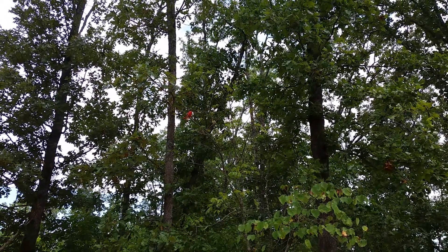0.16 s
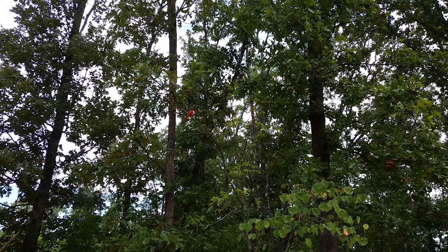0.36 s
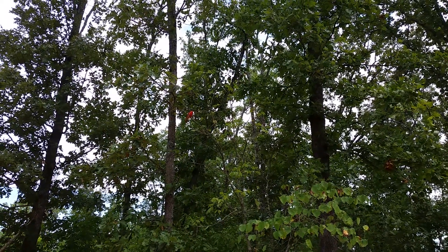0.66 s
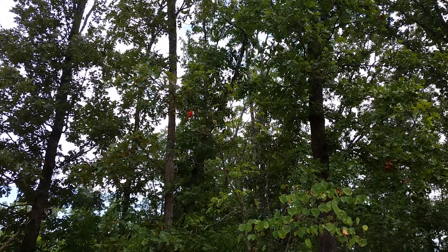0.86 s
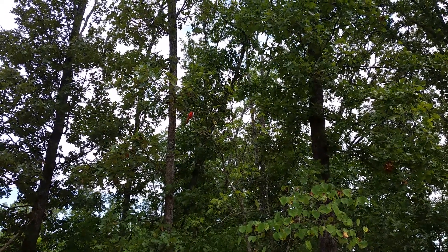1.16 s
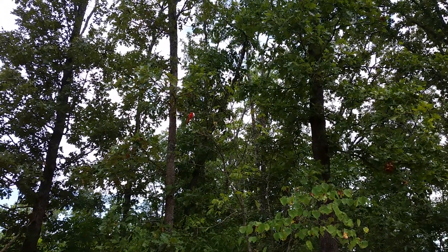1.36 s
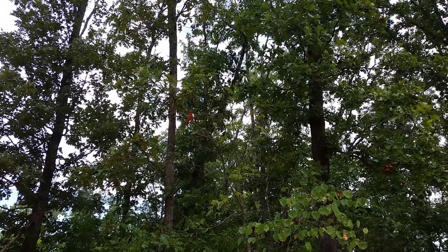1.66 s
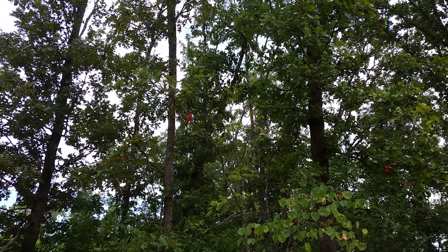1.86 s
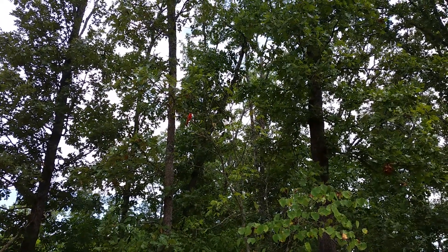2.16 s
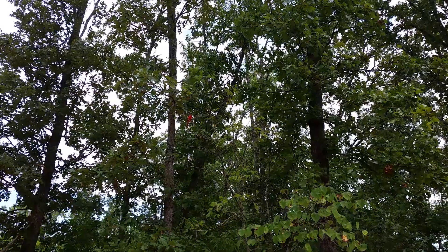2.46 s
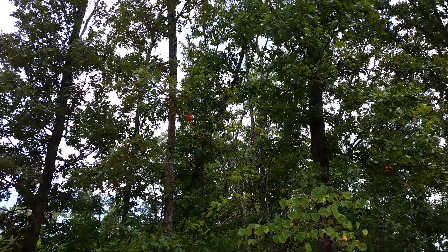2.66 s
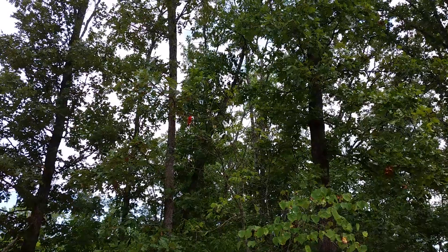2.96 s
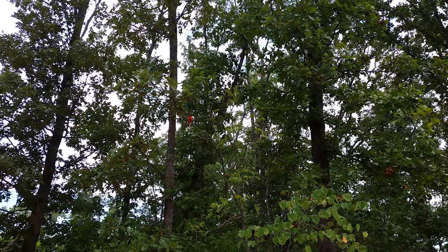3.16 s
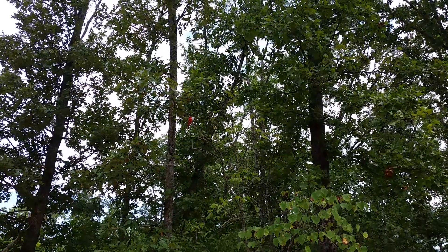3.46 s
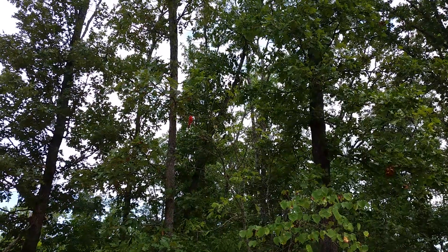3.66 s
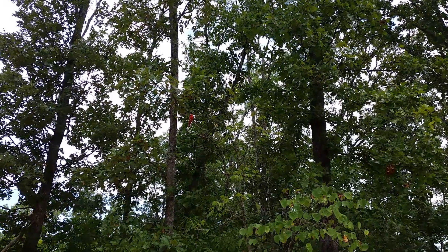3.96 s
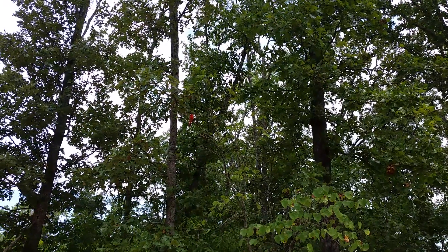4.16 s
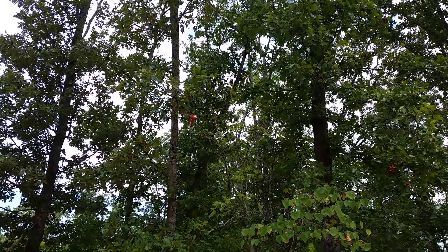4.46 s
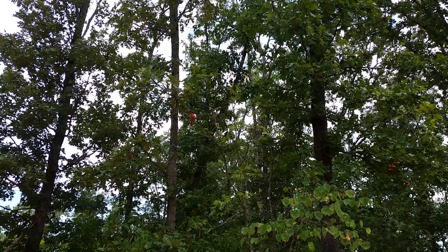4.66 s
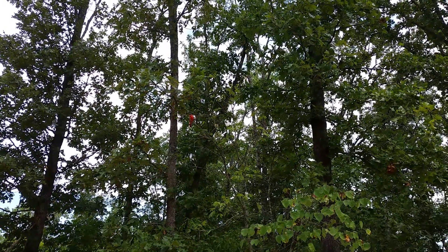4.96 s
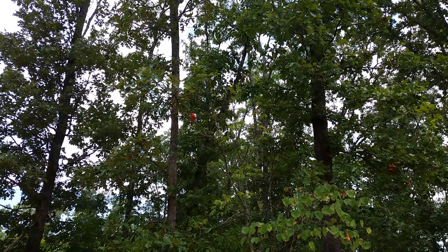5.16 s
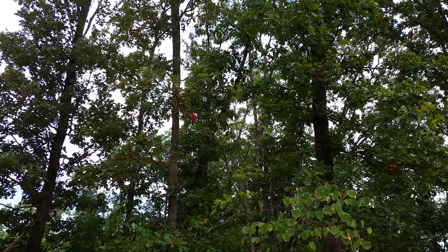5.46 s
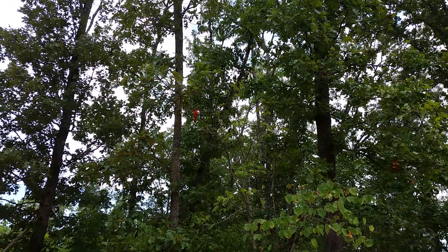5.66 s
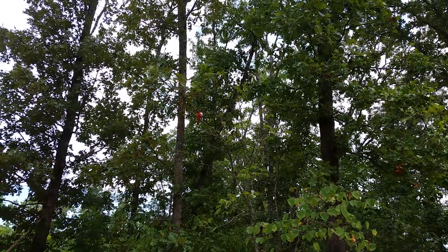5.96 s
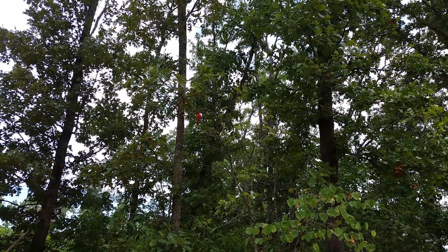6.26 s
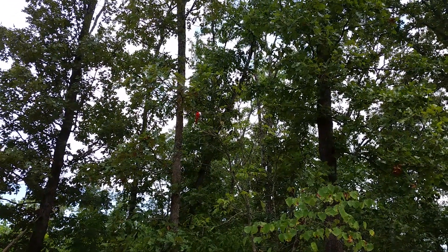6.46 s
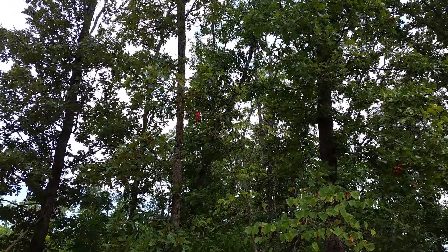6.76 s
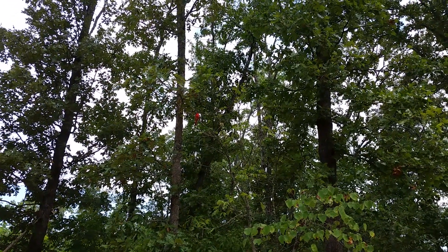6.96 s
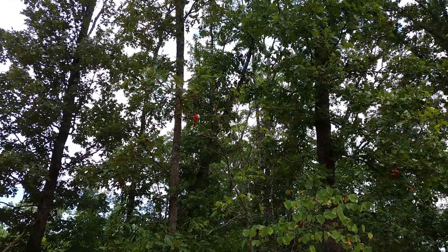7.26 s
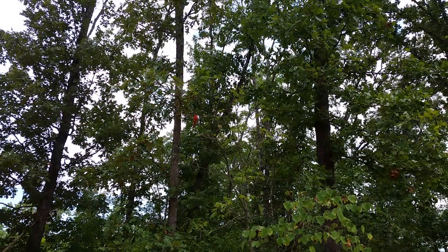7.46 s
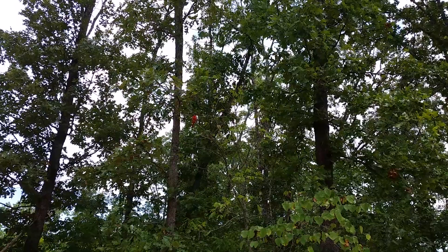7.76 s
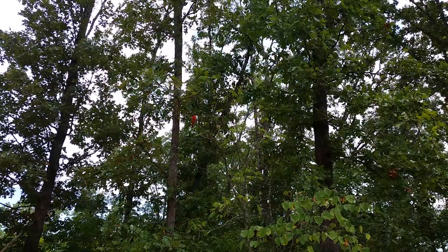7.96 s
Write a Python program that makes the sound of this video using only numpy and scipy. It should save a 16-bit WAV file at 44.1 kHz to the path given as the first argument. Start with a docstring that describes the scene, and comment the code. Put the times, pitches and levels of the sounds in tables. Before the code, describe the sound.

Distant cicadas hiss steadily among trees while a bird chips brightly four times, a katydid ticks and buzzes faintly, and a hand knocks the microphone.

```python
"""First heard are cicadas droning far off in a wood, over still air and a hand rumbling at the left port of a phone.
High among the trunks a songbird gives four short rising chips, whistle and octave, scattered by noise echoes.
A meadow katydid ticks twelve times, then buzzes: bands of noise shaped by wing strokes.
The cicadas are pulsed noise in resonances; the hand is filtered noise, with damped swings for bumps and
short dents for ticks. The two phone ports serve as left and right microphones."""
import sys
import numpy as np
from scipy import signal
from scipy.fft import rfft, irfft
from scipy.io import wavfile
from scipy.ndimage import uniform_filter1d, minimum_filter1d

SR = 44100
rng = np.random.default_rng(int(sys.argv[2]) if len(sys.argv) > 2 else 0)


def dump(signal):
    """Clip the signal to [-1, 1] and save it as 16-bit WAV at the path in sys.argv[1]."""
    limited = np.clip(np.atleast_2d(signal).T, -1, 1)
    pcm = np.round(limited * 32767).astype(np.int16)
    wavfile.write(sys.argv[1], SR, pcm)


N = 357210  # samples


def undb(db):
    """Decibels to amplitude."""
    return 10 ** (np.asarray(db) / 20)


def unit(x):
    """Scale each channel to an RMS of 1."""
    return x / np.sqrt(np.mean(x ** 2, axis=-1, keepdims=True))


def curve(rows):
    """Columns of a (t/s, ..) table, interpolated at every sample."""
    s, *columns = np.transpose(rows)
    return [np.interp(np.arange(N) / SR, s, column) for column in columns]


def band(x, hz, width_hz):
    """Steep resonance: a two-pole band-pass applied twice, gain 1 at the centre."""
    b, a = signal.iirpeak(hz, hz / width_hz, fs=SR)
    once = signal.lfilter(b, a, x)
    return signal.lfilter(b, a, once)


def sides(pan_db):
    """Left and right gains that differ by pan_db."""
    return undb(np.array([pan_db, -pan_db]) / 2)


def walk(rate):
    """Random levels held 1 / rate s and slewed twice; spread near 1."""
    hold = int(SR / rate)
    steps = np.repeat(rng.standard_normal(N // hold + 1), hold)
    slewed = uniform_filter1d(uniform_filter1d(steps, hold), hold)
    return 1.28 * slewed[:N]


def add(out, s, x):
    """Mix a stereo sound into out from time s."""
    i = int(s * SR)
    out[:, i:i + x.shape[1]] += x[:, :N - i]


# Far cicada chorus, broad body resonances, then narrow steady peaks that give the drone a fine ripple;
# levels are relative: [f/Hz, width of each filter pass/Hz, left level/dB, right level/dB]
CICADA_BANDS = [(2924, 600, -24.5, -14), (3545, 960, -13.5, -7), (4140, 1040, -13, -8.5),
                (4994, 820, -6, -5.5), (5560, 670, -4, -4.5), (6157, 547, -1, 2), (7035, 395, -2, -9),
                (7740, 770, -5, -10.5), (8600, 500, -25, -32), (2690, 70, -26, -13),
                (3193, 140, -17.5, -4.5), (3427, 74, -14, -3), (3582, 91, -24, 0), (3980, 88, -8, -3.5),
                (4156, 73, -3.5, -5.5), (4600, 90, -6, -1.5), (4853, 92, -6, 1), (5800, 52, 0, 6),
                (6220, 80, 5.5, -1), (6750, 114, 2, 1.5), (7290, 140, 3, -8), (7853, 100, -2, -17)]
TYMBAL_HZ, RIBS = 44.35, 8  # mean muscle beat; rib clicks per beat
CHORUS_SHARED, CHORUS_LAG = 0.34, 21  # share heard alike at both ports; samples by which the right one lags


def cicadas(top_db):
    """Noise rings in broad and narrow bands, pulsed by the tymbal muscle beat and its rib clicks."""
    beat = 2 * np.pi * np.cumsum(TYMBAL_HZ * (1 + 0.00808 * walk(1.7))) / SR
    out = 0
    for hz, width_hz, l_db, r_db in CICADA_BANDS:
        shift = rng.uniform(0, 1.0, 3)  # radians
        depth = .32 if hz < 4500 else .14
        throb = 1 + depth * np.cos(beat + shift[0])
        throb = throb + 0.07 * np.cos(2 * beat + shift[1])
        throb = throb + 0.32 * np.cos(RIBS * beat + shift[2])
        left, other = rng.standard_normal((2, N))
        right = CHORUS_SHARED * np.roll(left, CHORUS_LAG) + np.sqrt(1 - CHORUS_SHARED ** 2) * other
        hiss = band(throb * np.array([left, right]), hz, width_hz) * np.sqrt(SR / 15000)
        # turning the phone changes the high bands at the left port only
        turn_db = np.clip((hz - 5500) / 1500, 0, 1) * top_db * np.array([[1], [0]])
        drift_db = .6 * walk(1.126) + 0.72 * walk(8)
        out = out + undb([[l_db], [r_db]] + turn_db + drift_db) * hiss
    return out


# Colour of the still air and distant hum, relative: [f/Hz, left level per Hz/dB, right level per Hz/dB]
HUSH_COLOUR = [(40, 21, 6.5), (108, 16.5, 18), (240, -4.5, 10.5), (650, 2, 5.5), (1020, -6, -1.5),
               (1550, -7, -1.5), (2320, -7.5, 4), (8880, -1.5, 0), (9030, -36, -33), (11400, -36, -44),
               (11870, -14, -3), (12400, -10.5, -7), (13500, -7.5, -10), (16300, -20, -2.5)]
HUSH_DB = -20.5  # whole hush against the cicadas


def hush():
    """Smooth far noise, coloured in frequency and unrelated at the two ports."""
    hz, *ears_db = np.transpose(HUSH_COLOUR)
    log_f = np.log(np.maximum(np.fft.rfftfreq(N, 1 / SR), 1))
    colour = undb([np.interp(log_f, np.log(hz), db) for db in ears_db])
    spectrum = rfft(rng.standard_normal((2, N)))
    return undb(HUSH_DB) * irfft(spectrum * colour, N)


# Hand gripping the phone: [t/s, rumble level at the left port/dB]
GRIP = [(0.0, -40.5), (1.65, -41), (1.83, -39), (2.84, -40.5), (3.87, -40), (3.9, -33.5), (4.9, -29.5),
        (5.21, -34.5), (5.57, -37.5), (5.91, -34), (6.41, -37.5), (7.04, -38.5), (8.1, -37)]


def rumble():
    """Muscle tremor shakes the case: low noise in two resonances, far weaker at the right port."""
    noise = rng.standard_normal((2, N))
    tremor = unit(band(noise, 64, 42) + 0.36 * band(noise, 96.7, 46.7))
    return tremor * undb(curve(GRIP)[0] + 1.43 * walk(14)) * undb([[0], [-20.5]])


# Skin sliding on the case in short slips: [t of peak/s, left peak level/dB, fade per 20 dB/s]
SLIPS = [(3.9, -52, .08), (4.2, -59, .12), (4.72, -58, .08), (4.85, -50, .08), (5.38, -57, .3),
         (5.46, -61, .1), (5.9, -47.5, .1), (5.94, -45, .035), (6.06, -46, .025), (6.1, -43, .02),
         (6.3, -62, .6)]
RUB_RISE_S, RUB_FLOOR_DB = .04, -72  # rise per 20 dB; resting contact


def rub():
    """Skin friction: uneven grit between 200 and 800 Hz, swelling with each slip."""
    grit = undb(2.5 * rng.exponential(size=(2, N))) * rng.standard_normal((2, N))
    b, a = signal.butter(2, [200, 800], "band", fs=SR)
    scuff = unit(signal.lfilter(b, a, grit)) * undb(2.0 * walk(53))
    now = np.arange(N) / SR
    slips = sum(undb(db - 20 * np.maximum((s - now) / RUB_RISE_S, (now - s) / fade)) for s, db, fade in SLIPS)
    return scuff * (slips + undb(RUB_FLOOR_DB)) * undb([[0], [-13]])


# Dull finger bumps on the case: [t near the strongest swing/s, relative left level/dB, nominal ring f/Hz]
BUMPS = [(0.416, -24, 74), (1.07, -25.5, 74), (1.403, -29, 77.6), (2.734, -16, 76), (2.841, -18.5, 57),
         (3.924, -20.5, 71), (3.974, -25, 65), (4.079, -20.5, 65), (4.126, -22.5, 89), (4.175, -18, 81),
         (4.222, -16.5, 81), (4.681, -18.5, 73), (4.731, -12.5, 100), (4.839, -21.5, 94), (4.942, -17, 85),
         (4.96, -5.5, 122.5), (4.989, -18, 54.5), (5.28, -24, 71.6), (5.327, -23.5, 78.5),
         (5.816, -25, 68.5), (5.875, -26.5, 88), (5.916, -23, 82.4), (6.057, -23, 85.5), (6.095, -21, 84),
         (6.296, -26, 91), (6.365, -20, 115), (6.642, -26, 89), (6.744, -24, 80), (6.91, -26.5, 79),
         (7.647, -27.5, 73), (7.752, -25.5, 79)]
BUMP_RIGHT_DB = -28  # right port against left
FAINT_BUMP_COUNT, FAINT_BUMP_DB, FAINT_BUMP_HZ = 9, -32, 72  # placed at random, level and pitch scattered


def bumps():
    """A bump sets the case swinging low; the swing swells, slows and dies within a few cycles."""
    out = np.zeros((2, N))
    t = np.arange(SR // 8) / SR
    faint = [(.1 + u * (N / SR - .3), FAINT_BUMP_DB + 6 * (v - .5), FAINT_BUMP_HZ * (1 + .3 * (w - .5)))
             for u, v, w in rng.uniform(size=(FAINT_BUMP_COUNT, 3))]
    for s, db, hz in BUMPS + faint:
        cycles = t * hz
        # the case bends quickly at first, then swings slower as it settles
        swing = np.sin(2 * np.pi * (0.76 * cycles + 0.58 * (1 - np.exp(-cycles / .5))))
        swell = cycles / .6 * np.exp(1 - cycles / 0.63)
        add(out, s - .7 / hz, -undb([[db], [db + BUMP_RIGHT_DB]]) * swell * swing)
    return out


# Sharp ticks of skin and case: [t 1 ms before the dent/s, relative left level/dB, relative right level/dB]
CLICKS = [(2.721, -44, -33), (2.829, -40.5, -27.5), (3.893, -45, -31), (4.03, -43, -36),
          (4.199, -34.5, -42.5), (4.355, -34.5, -59), (4.568, -35.5, -42.5), (4.711, -36.5, -59),
          (4.722, -39.5, -51), (4.844, -40.5, -40), (4.955, 4, -34.5), (4.974, -22, -30.5),
          (5.549, -36, -57), (5.925, -35.5, -47), (5.937, -29.5, -51), (5.951, -32.5, -53),
          (6.0, -38.5, -53), (6.022, -37.5, -54), (6.039, -25.5, -51), (6.049, -33.5, -55),
          (6.081, -20.5, -46), (6.1, -27.5, -62), (6.22, -34.5, -61), (6.287, -30.5, -53),
          (6.36, -39.5, -60), (6.553, -32.5, -56), (6.623, -36.5, -64)]
CLICK_WIDTH_MS, CLICK_RIGHT_WIDTH_MS = .48, .3  # thinner and brighter at the right port


def clicks():
    """Each tick is a sharp inward dent inside a broader rebound, with a little decaying noise."""
    out = np.zeros((2, N))
    t = np.arange(SR // 8) / SR
    for s, l_db, r_db in CLICKS:
        x = (t - .004) * 1000 / np.array([[CLICK_WIDTH_MS], [CLICK_RIGHT_WIDTH_MS]])
        rebound = 0.31 * np.exp(-(x / 3.6) ** 2)
        dent = np.exp(-x ** 2) + 0.26 * np.exp(-np.hypot(x, .2) / 0.43)
        noise = band((t > .003) * rng.standard_normal(len(t)), 970, 2000)
        snap = rebound - dent + 0.12 * np.exp(-t / .004) * noise
        add(out, s - .003, undb([[l_db], [r_db]]) * snap)
    return out


def hand():
    """Everything the hand does to the case: tremor, rubbing, bumps and ticks."""
    return rumble() + rub() + bumps() + clicks()


# Echo decays of the wood, near leaves then far trunks: [60 dB fade t/s, relative level/dB]
WOOD_DECAYS = [(0.158, -1.5), (.7, -11.5)]
TRUNK_S, TRUNK_DB = 0.0534, 1.5  # delay and level of one trunk's answer at the right, against the fade


def wood():
    """Scattered echoes, uneven in size and different at each port; one trunk on the right answers more strongly."""
    t = np.arange(SR // 2) / SR
    fade = sum(undb(db - 60 * t / t60) for t60, db in WOOD_DECAYS)
    fade = fade * np.minimum(t / 0.0043, 1)
    trunk = np.exp(-((t - TRUNK_S) / .003) ** 2)
    fade = fade * (1 + undb([[TRUNK_DB - 12], [TRUNK_DB]]) * trunk)
    size = undb(1.8 * rng.exponential(size=(2, len(t))))
    return fade * unit(size * rng.standard_normal((2, len(t))))


# Chips of the bird: [t/s, start f/Hz, f it levels off towards/Hz, glide/ms, swell/ms, length/ms, fade/dB,
#   right lag/ms, left level/dB, right level/dB, octave left level/dB, octave right level/dB, echo level/dB]
CHIPS = [(.5003, 5500, 7500, 12.5, 10, 17.5, -9, .03, -1, -9, -38, -22, -37),
         (2.682, 5950, 7570, 7.5, 4, 18, -11, .04, -1, -10, -38, -25, -40),
         (4.7612, 5950, 7900, 9.5, 4.5, 13, -16, .03, -1, -9, -32, -15, -37.5),
         (7.0735, 5950, 7400, 11, 4.5, 14.5, -3, .075, -2.5, -6.5, -41, -41, -41)]
OCTAVE_ECHO_DB = -21.5  # octave against whistle in the echo, mean of the two ports


def bird():
    """A whistle that leaps up and levels off, with its octave; the beak aims each differently at the two ports."""
    out = np.zeros((2, N))
    for s, lo_hz, hi_hz, glide, swell, length, fade_db, lag, l_db, r_db, l2_db, r2_db, echo_db in CHIPS:
        ms = np.maximum(np.arange(SR // 40) / SR * 1000 - np.array([[0], [lag]]), 0)
        rise = ms / glide / (1 + (ms / glide) ** 4) ** (1 / 4)
        pitch_hz = (lo_hz + (hi_hz - lo_hz) * rise) * (ms > 0)
        phase = 2 * np.pi * np.cumsum(pitch_hz, axis=1) / SR
        effort = np.sin(np.pi / 2 * np.clip(ms / swell, 0, 1)) ** 1.4
        effort = effort * np.clip((length - ms) / 2, 0, 1)  # closes over the last 2 ms
        effort = effort * undb(fade_db * np.clip((ms - swell) / (length - swell), 0, 1) ** .8)
        tone = effort * np.sin(phase)
        # the octave grows faster than the whistle with effort
        octave = effort ** 1.1 * np.sin(2 * phase)
        add(out, s, undb([[l_db], [r_db]]) * tone + undb([[l2_db], [r2_db]]) * octave)
        octave_gain = undb(OCTAVE_ECHO_DB + np.array([[-3.0], [3.0]]))
        spread = undb(echo_db) * (tone[:1] + octave_gain * octave[0])
        add(out, s, sides(np.array([1.5])) * signal.fftconvolve(spread, wood(), axes=1))
    return out


TICK_COUNT, FIRST_TICK_S, TICK_GAP_S = 12, 2.885, .0719
TICK_DB, TICK_SCATTER_DB = -60, 1.5


def katydid_ticks():
    """Single wing strokes: evenly spaced short scrapes of high noise."""
    out = np.zeros((2, N))
    stroke = np.hanning(SR // 60)
    for k, chance in enumerate(rng.standard_normal(TICK_COUNT)):
        scrape = unit(band(rng.standard_normal((2, N // 100)), 13900, 2600))[:, -len(stroke):]
        level = undb(TICK_DB + TICK_SCATTER_DB * chance) * sides(np.array([-4.5]))
        add(out, FIRST_TICK_S + k * TICK_GAP_S, level * stroke * scrape)
    return out


# Katydid buzz: [t/s, relative level/dB, centre f/Hz, left minus right level/dB]
BUZZ = [(3.69, -88, 14000, -5), (3.72, -69, 14100, -5), (3.9, -62, 14300, -5), (4.7, -55, 14700, -5),
        (5.3, -60, 15200, -5), (5.48, -64, 14500, -10), (5.62, -72, 15200, -2), (6.0, -72, 15700, 2),
        (6.25, -59, 15700, -2), (6.9, -60, 15700, 2), (7.58, -59, 15700, 2), (7.62, -88, 15500, 1)]
STROKE_HZ = 34  # mean rate


def katydid_buzz():
    """Wing strokes run together: high noise throbs while its bright region slides across three bands."""
    throb = .3 + np.sin(np.pi * np.cumsum(STROKE_HZ * (1 + 0.013 * walk(2.2))) / SR) ** 2
    db, hz, pan_db = curve(BUZZ)
    wing = 0
    for f in (13600, 14500, 15500):
        nearness = np.exp(-((hz - f) / 850) ** 2)
        wing = wing + nearness * unit(band(rng.standard_normal((2, N)), f, 1100))
    return undb(db) * sides(pan_db) * throb * wing


# Distant wood reaching the moving phone:
# [t/s, relative level/dB, left minus right level/dB, change at the top of the chorus/dB]
AIR = [(0.0, -34, -1, 0), (0.38, -33, 0.5, 1), (2.5, -32.5, 1, -2), (3.9, -32.5, -.5, 0),
       (4.71, -31, 1.5, 0.5), (5.14, -34, 1.5, 1), (5.3, -36, 2, 2), (5.55, -40, 1.5, 1),
       (5.84, -37.5, 1.5, 0.5), (6.07, -35, 1.5, 0.5), (6.79, -32, 3.5, 2), (7.35, -33.5, 1.5, 1.5),
       (8.1, -32.5, 3, 2.5)]


def scene():
    """Far cicadas and hush move with the phone; hand, bird and katydid are added."""
    air_db, pan_db, top_db = curve(AIR)
    far = undb(air_db) * sides(pan_db) * (cicadas(top_db) + hush())
    return far + hand() + bird() + katydid_ticks() + katydid_buzz()


DARK_BAND_HZ, DARK_BAND_WIDTH_HZ = 10100, 1000
TOP_HZ = 15850  # nothing much is heard above


def record(dry):
    """A narrow band near 10 kHz is quiet; a quick limiter holds the peaks and ducks the background; the top is cut."""
    b, a = signal.iirnotch(DARK_BAND_HZ, DARK_BAND_HZ / DARK_BAND_WIDTH_HZ, fs=SR)
    dry = signal.lfilter(b, a, dry)
    peak = -minimum_filter1d(-np.abs(dry).max(axis=0), size=301)  # loudest nearby sample of either port
    gain = uniform_filter1d(np.minimum(.92 / peak, 1), size=301)
    top_cut = signal.ellip(10, .2, 80, TOP_HZ, fs=SR, output="sos")
    return signal.sosfilt(top_cut, dry * gain)


dry = scene()
out = record(dry)
dump(out)
```